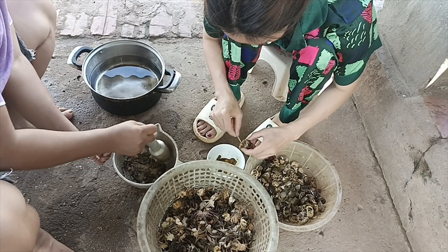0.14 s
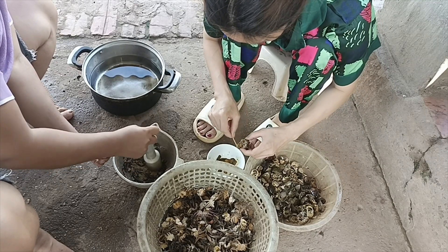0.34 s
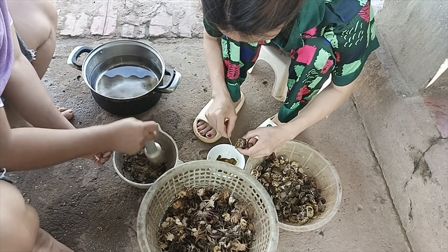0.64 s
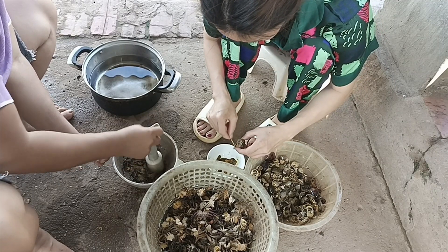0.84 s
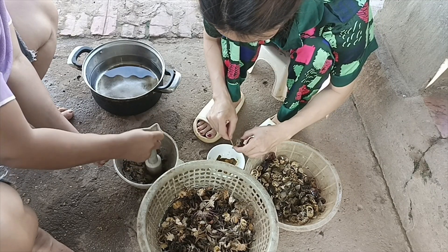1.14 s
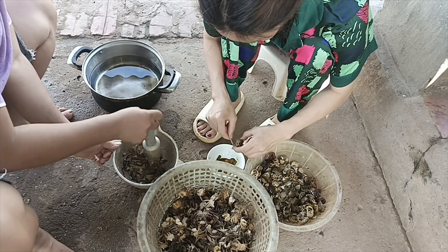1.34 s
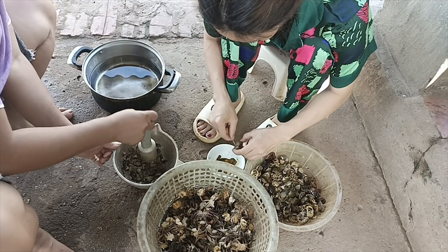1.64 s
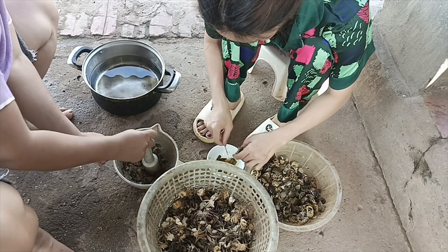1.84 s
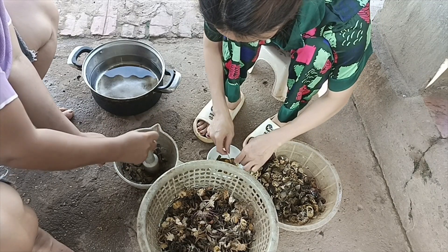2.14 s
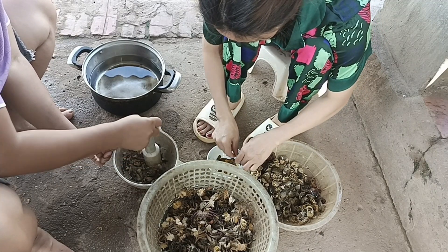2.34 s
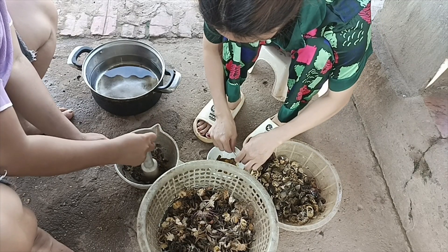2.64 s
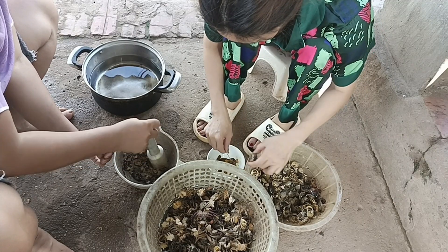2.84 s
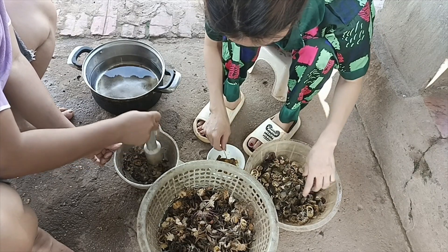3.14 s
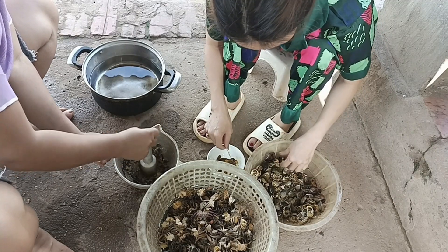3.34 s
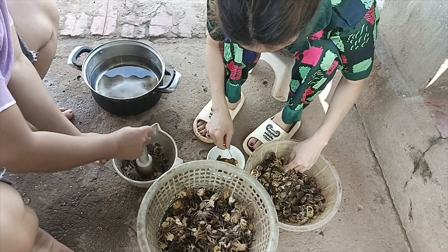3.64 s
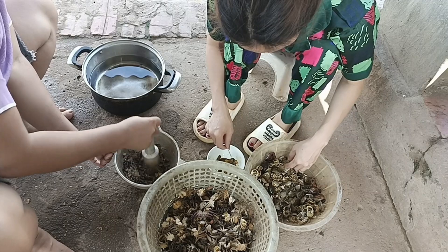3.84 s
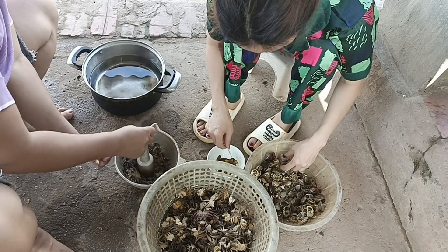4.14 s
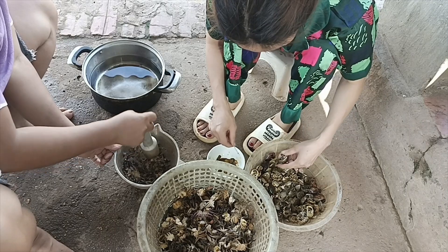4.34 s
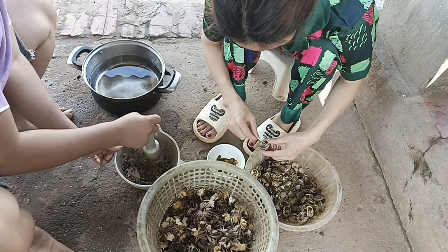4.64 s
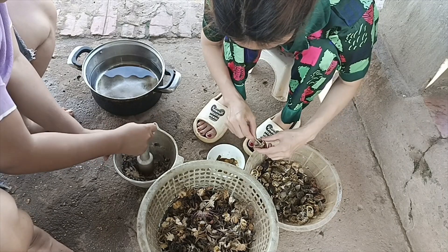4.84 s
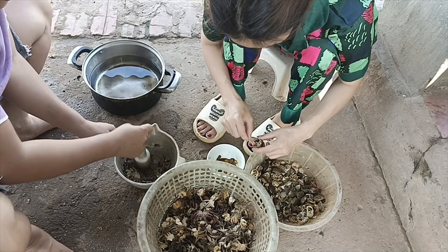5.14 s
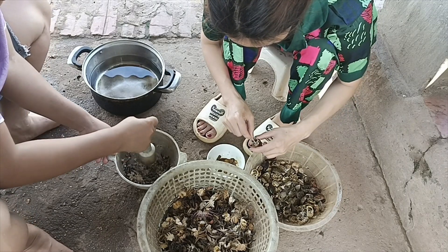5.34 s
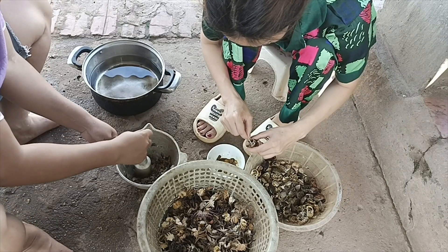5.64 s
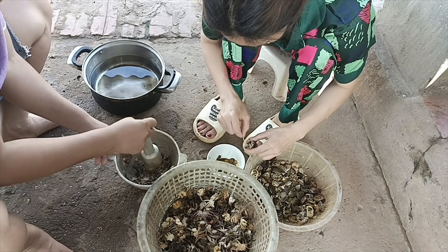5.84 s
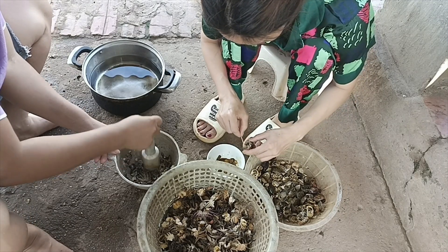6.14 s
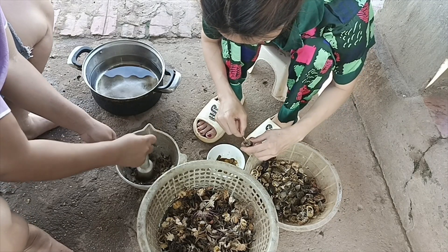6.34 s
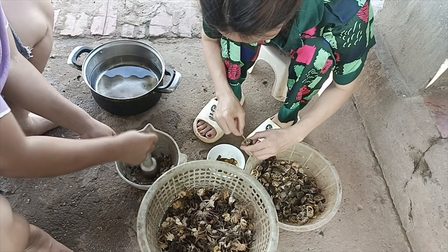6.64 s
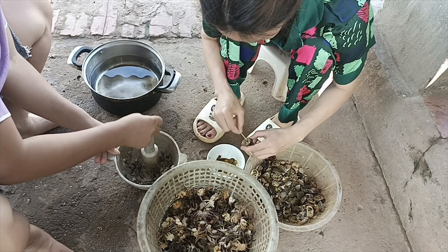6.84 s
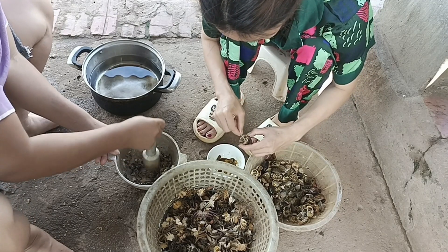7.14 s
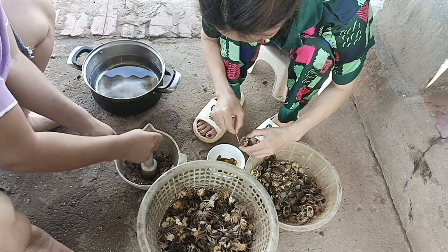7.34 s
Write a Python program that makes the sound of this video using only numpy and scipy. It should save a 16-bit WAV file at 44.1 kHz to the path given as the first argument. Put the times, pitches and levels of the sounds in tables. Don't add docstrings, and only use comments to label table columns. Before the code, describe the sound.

A pestle pounds shelled food in a small hollow bowl on concrete, about three crunchy knocks a second, with ringing rim clinks and rattling shells.

```python
import sys
import numpy as np
from scipy import signal
from scipy.fft import rfft, irfft, next_fast_len
from scipy.io import wavfile
from scipy.ndimage import uniform_filter1d

SR = 44100
rng = np.random.default_rng(int(sys.argv[2]) if len(sys.argv) > 2 else 0)


def wav_out(sig):
    wavfile.write(sys.argv[1], SR, np.round(np.clip(np.atleast_2d(sig).T, -1, 1) * 32767).astype(np.int16))


def decibels_to_gain(level_db):
    exponent = np.asarray(level_db, float) / 20
    return 10 ** exponent


N = 329868
LONG = int(0.6 * SR)
T = np.arange(LONG) / SR

# freq_hz, level_db per Hz
AIR = [(24, -52), (60, -10.5), (141, -9.5), (510, -23.5), (2090, -30.5), (6020, -50), (9240, -40),
       (16500, -62.5)]
# centre_hz, width_log_hz, boost_db
AIR_BANDS = [(725, 0.12, 11.5), (1280, 0.058, 13.5), (4250, 0.48, 5.5), (8350, .06, 7), (10400, 0.048, 12)]
AIR_FLUTTER_DB = (4.5, 3.5, 2, 5.5, 5.5)
# pitch_hz, level_db, t60_s
LEFT_OVER = [(701, -52, .5), (735, -60, .4), (1390, -37, .9), (2551, -40, .7), (3883, -65, .4),
             (3998, -65, .4)]

# start_s, crunch_db, t60_s, dullness_db per octave, snap_db
CRUSHES = [(0.096, -18, 0.43, 4, 6.5), (0.606, -22, 0.22, 0, 9.5), (0.982, -23, 0.31, 1, 15.5),
           (1.331, -22, 0.27, -1.5, 15), (1.702, -22, 0.32, 0, 14), (2.0511, -18.5, 0.32, 2, 9),
           (5.038, -26.5, 0.075, -5.5, 4.5), (5.4085, -11, 0.39, 4, 3.5), (6.226, -18.5, 0.41, 3.5, 11.5),
           (6.564, -20.5, 0.23, -2.5, 13.5), (6.8928, -24, 0.326, -0.5, 15.5), (7.216, -34.5, 0.48, -1, 18)]
# start_s, crunch_db, t60_s, dullness_db per octave, snap_db
SQUEEZES = [
    (2.4783, -19.5, 0.31, 4, 3.5),
    (2.8731, -21.5, 0.2, 2.5, 13),
    (3.2294, -21, 0.23, 2.5, 15.5),
    (3.5757, -20.5, 0.2, 1.5, 2),
    (3.9607, -21, 0.28, 0.5, 14),
    (4.3053, -17, 0.19, -2.5, -22),
    (4.7124, -21.5, 0.25, -3, 4.5),
    (4.7525, -30.5, 0.23, -1.5, 5),
    (5.0754, -25.5, 0.17, 0.5, -2.5),
    (5.856, -23, 0.23, 0, 13.5),
]
# freq_hz, level_db per Hz
CRUNCH = [(650, -42), (1300, -2), (4200, 3), (4750, -13), (6600, -11), (7950, -5), (9700, -13),
          (15300, -16)]

# start_s, peak_db, hollow_hz, clack_db re peak
BLOWS = [(0.095, -19, 679, 10), (0.114, -24, 680, -18), (0.131, -33, 758, 14.5), (0.982, -17, 846, -3.5),
         (1.334, -18.5, 739, -21), (1.702, -19, 585, 0), (2.051, -15.5, 689, 4), (2.48, -12, 703, 4),
         (2.507, -15, 800, 1.5), (2.548, -18, 739, -0.5), (2.874, -19, 804, -13.5), (3.586, -35, 750, -19),
         (3.964, -19.5, 730, -27), (4.278, -34, 710, -17), (4.316, -23.5, 717, -4.5),
         (4.359, -19, 727, -6.5), (4.371, -17, 692, -31), (4.712, -17, 815, -15), (4.742, -31, 670, 8),
         (5.037, -19, 690, -6.5), (5.081, -32, 718, -9), (5.408, -16, 682, 12.5), (5.539, -18.5, 718, -8),
         (5.564, -38.5, 702, 6), (5.858, -32, 763, -14), (6.564, -20, 813, 0.5), (6.893, -14.5, 758, -11.5)]
# start_s, peak_db, hollow_hz, porch_t60_s
ROCKS = [(0.141, -21.5, 723, 0.41), (0.608, -19, 756, 0.2), (0.69, -49.5, 700, 0.17),
         (0.724, -47, 719, 0.16), (0.743, -52, 785, 0.074), (1.707, -12, 837, 0.41),
         (2.521, -10.5, 742, 0.46), (2.893, -32, 734, 0.32), (3.232, -21.5, 721, 0.38),
         (3.296, -27, 755, 0.16), (3.66, -17, 697, 0.088), (3.675, -24.5, 737, 0.29),
         (3.786, -33, 714, 0.25), (3.797, -32.5, 750, 0.18), (3.878, -44, 681, 0.29),
         (3.892, -56, 720, 0.088), (4.036, -37, 745, 0.1), (4.059, -22, 725, 0.2),
         (4.186, -37.5, 665, 0.09), (4.199, -51.5, 698, 0.2), (4.261, -29, 640, 0.78),
         (4.386, -18, 716, 0.065), (4.427, -50, 720, 0.14), (4.831, -16, 719, 0.37),
         (4.873, -24, 724, 0.37), (4.915, -68, 770, 0.09), (5.171, -21.5, 681, 0.15),
         (5.2, -26.5, 710, 0.18), (5.433, -20, 717, 0.67)]
# pitch_ratio, level_db, t60_s
HOLLOW = [(0.622, -12.5, .03), (.76, -8, 0.027), (0.999, 3, 0.038), (1.02, -15.5, 0.11),
          (1.089, -2.5, 0.041), (1.241, -12.5, 0.033), (1.502, -24, 0.023)]
# pitch_hz, level_db, t60_s
CLACK = [(1370, -0.5, 0.011), (1653, -1.5, 0.013), (2000, -17, 0.018), (2570, -20, .01)]

# start_s, first_ring_db, first_ring_hz, second_ring_db, third_ring_db
RIMS = [
    (0.097, -33, 1396, -35, -32),
    (0.1114, -30.5, 1396, -33, -41.5),
    (2.48, -27, 1390, -15.5, -39.5),
    (4.716, -51, 1384, -48, -49.5),
    (5.034, -47.5, 1410, -52.5, -64),
    (5.406, -32.5, 1425, -35, -27.5),
]
RIM_ASIDE = [
    (1.2, 0.1, .55),
    (1.2, 0.1, .55),
    (.6, -.05, .7),
    (.4, .2, .3),
    (.4, 0, 0),
    (.8, 1.1, .6),
]
UPPER_HZ = (2546, 3885)
# t60_s, gate_close_s at -30 dB, twin_db
RINGS = [
    (.58, 0.42, -11.5),
    (.55, 0.36, -16),
    (0.4, 0.33, -14),
]
TWINS = (1.2, 1.012, 1.028)
# pitch_hz, level_db re first ring, t60_s
RIM_HIGH = [(1744, -7.5, 0.17), (4350, -27, 0.15), (5550, -23, 0.16), (6500, -25, 0.13), (7800, -28, 0.28),
            (8840, -28, 0.15), (10200, -33, .12)]
# start_s, level_db, pitch_hz, t60_s
WOKEN = [(0.098, -19.5, 2502, 0.18), (0.098, -25.5, 2550, 0.23), (0.096, -26, 3995, .22),
         (0.096, -38.5, 3100, 0.12), (0.113, -30.5, 2590, .3), (2.48, -33.5, 3996, 0.39),
         (2.48, -38, 2680, .4), (2.48, -40.5, 2433, .3), (5.407, -41, 2732, .4), (5.407, -41, 2400, 0.28),
         (5.6, -49.5, 683, .35)]

# start_s, level_db, centre_hz, spread_0_to_1, t60_s
CHATTER = [(0.098, -26, 2210, 0.26, 0.22), (0.112, -34.5, 3884, 0.03, 0.35), (2.481, -30, 2923, 0.19, 0.36),
           (2.482, -39, 3170, 0.23, 0.21), (2.49, -55, 5470, 0, 0.2), (4.75, -47, 5250, 0.04, 0.26),
           (5.408, -38, 2884, 0.28, 0.31), (5.41, -49, 4470, 0.2, 0.19), (5.41, -52.5, 5550, 0, .3),
           (6.228, -30.5, 2600, 0.06, 0.51), (6.895, -44, 4900, 0.17, 0.33), (6.23, -30, 1620, 0.1, 0.64),
           (0.1, -36, 1700, 0.05, 0.34), (2.053, -42, 3500, 0.22, 0.27), (6.897, -32.5, 785.5, 0.3, 0.19),
           (7.22, -42, 2560, 0.04, 0.22), (7.225, -33.5, 962, 0, 0.97), (1.71, -35.5, 949, 0.2, 0.49),
           (1.71, -49, 3300, 0.5, 0.19), (6.3, -46.5, 4800, 0.004, 0.39), (6.24, -52.5, 7300, 0.06, 0.46),
           (3.6, -47, 2700, 0.2, 0.1)]
# start_s, peak_db, pitch_hz, t60_s
PUNCHES = [(0.101, -22, 1340, 0.0039), (0.1147, -15.5, 1210, 0.0062), (0.9815, -10.5, 919, 0.02),
           (1.7016, -9.5, 468, 0.015), (1.7038, -9, 1136, 0.011), (1.7056, -22.5, 980, 0.0073),
           (2.052, -14, 1020, 0.01), (2.480, -8.5, 1605, 0.013), (2.5235, -12, 865, 0.018),
           (5.404, -27, 1570, 0.019), (6.2273, -6, 1625, 0.013), (6.8935, -7.5, 757, 0.019),
           (7.2164, -6.5, 1204, 0.0096), (7.2178, -7, 837, 0.011)]

# start_s, level_db
RAPS = [
    (0.11, -43.5),
    (2.51, -34),
    (4.36, -39.5),
    (4.832, -41.5),
    (5.415, -39),
    (5.688, -70),
    (6.245, -36),
    (7.282, -35.5),
]
# pitch_hz, level_db, t60_s
RAP = [(224, -1.7, 0.0095), (246, -2.5, 0.041), (340, -0.1, 0.096)]
# start_s, level_db, packed_food_db re slab, porch_t60_s
THUDS = [(0.602, -44.5, 10.5, 0.28), (0.72, -53, -1.5, 0.31), (0.979, -32.5, -1.5, 0.3),
         (1.15, -51.5, -11, 0.19), (1.332, -26.5, -7, 0.32), (1.41, -41.5, -10, 0.19),
         (1.699, -30, -2.5, 0.61), (2.05, -29.5, 3, 0.53), (2.87, -40, -9, 0.35), (3.229, -34.5, -13, 0.29),
         (3.968, -50, 0, 0.44), (5.856, -47, -17.5, 0.35), (6.565, -31.5, -13.5, 0.2),
         (6.629, -41, -29, 0.2), (6.889, -29.5, -6, 0.46), (7.214, -38, 4, 0.62)]
# pitch_hz, level_db, t60_s
SLAB = [(86, 6.5, 0.032), (140, -7, 0.0083), (195.4, 4, 0.071), (243, -2, 0.073)]
# pitch_hz, level_db, t60_s
PACKED = [(314, 0.5, 0.012), (355, 7, 0.019), (430, 0, 0.054), (485, -6.5, 0.031), (980, 3, 0.013),
          (1200, -6.5, 0.049)]

# start_s, level_db, pitch_hz, t60_s
BITS = [(1.102, -49.5, 4030, 0.36), (1.118, -53, 3095, 0.17), (1.149, -45, 342, 0.28),
        (1.155, -56.5, 877, 0.46), (1.218, -58.5, 2370, 0.34), (1.275, -47.5, 358, 0.33),
        (1.34, -47, 4450, 0.34), (1.342, -36, 3490, 0.22), (2.301, -59, 2145, 0.16),
        (3.47, -56.5, 1426, 0.22), (3.469, -56, 2150, 0.14), (3.471, -54, 3910, 0.084),
        (3.661, -64.5, 3860, 0.4), (4.056, -50, 1240, 0.36), (6.12, -63, 682, 0.14),
        (1.185, -66, 2700, 0.19), (6.48, -64.5, 3730, 0.24), (7.102, -59.5, 4230, 0.078)]
# start_s, level_db, t60_s
PESTLE = [
    (1.708, -49, 1),
    (2.055, -47.5, 0.98),
    (6.894, -55, 0.57),
]

# start_s, level_db, swell_s, t60_s
RUSTLES = [
    (3.059, -45.5, 0.013, 0.068),
    (3.08, -38.5, .01, 0.035),
    (3.101, -43, 0.014, 0.12),
    (3.194, -62, 0.0047, 0.027),
    (3.469, -64.5, .01, 0.24),
]
# freq_hz, level_db per Hz
RUSTLE = [(880, -78), (1500, -30.5), (3220, 0.5), (4460, -6.5), (5120, -19.5), (8240, -22), (9280, -30),
          (16000, -26.5)]
# start_s, level_db, swell_s, t60_s
TICKS = [
    (6.163, -68, .003, 0.0293),
    (2.3, -62, .003, 0.038),
    (5.5, -68, .003, 0.038),
    (5.394, -71, .003, 0.015),
]
# freq_hz, level_db per Hz
TICK = [(2500, -40.5), (4200, -6), (5600, -11.5), (6800, 1), (8600, -32), (12000, -24)]

# start_s, peak_db, hollow_hz
SLAMS = [
    (6.228, -11, 778),
    (7.2175, -13.5, 742),
]
# pitch_hz, level_db, t60_s
STONE = [(480, -18.5, 0.0039), (1006, 2, 0.0083), (1269, -5, 0.011), (1400, 1, 0.019),
         (2150, -13.5, 0.0068), (2500, -15, 0.048)]

# freq_hz, left_minus_right_db
LEFT_MINUS_RIGHT = [(345, -2), (1550, 0.5), (5000, -3), (7000, -6), (7950, -12.5), (10200, 11), (13800, 10),
                    (15500, -2)]
# freq_hz, lead_rad
LEFT_LEADS = [(0, 0), (690, -.36), (1720, -1.3), (2580, -2.05), (4000, -3.9), (5500, -4.1), (7150, -4.8),
              (9300, -4.6), (13400, -9.4), (16400, -17)]

GATE_RATIO, SLAM_GATE_RATIO = 0.43, 0.26
BLOW_WET_DB, ROCK_WET_DB, WET_DB_PER_DB = -2, -4, -0.56
BLOW_PORCH_S, PORCH_S_PER_DB = 0.18, 0.06
RIM_FLUTTER_DB = 3


def fall(t60, t=T):
    return np.exp(-np.log(1000) * t / np.maximum(t60, 0.003))


def swell(rise_s, t=T):
    return 1 - np.exp(-t / rise_s)


def shut(after, t=T):
    return 1 / (1 + (t / after) ** 6)


def flutter(db, rate, size=LONG):
    hold = int(SR / rate)
    steps = rng.standard_normal(size // hold + 1).repeat(hold)
    return decibels_to_gain(db * uniform_filter1d(steps, hold)[:size])


def colour(x, points):
    size = next_fast_len(x.shape[-1])
    hz, db = np.transpose(points)
    shape = np.interp(np.log(np.fft.rfftfreq(size, 1 / SR) + 1), np.log(hz), db)
    return irfft(rfft(x, size) * decibels_to_gain(shape), size)[..., :x.shape[-1]]


def unit(x):
    return x / np.sqrt(np.mean(x ** 2))


def ring(modes, spread_db=2.5, size=LONG):
    hz, db, t60 = np.transpose(modes)[:, :, None]
    chance = rng.standard_normal((2, len(modes), 1))
    t = T[:size]
    level = decibels_to_gain(db + spread_db * chance[0])
    sign = np.where(spread_db * chance[1] < 0, -1, 1)
    return np.sum(level * sign * np.sin(2 * np.pi * hz * t) * fall(t60, t), axis=0)


def crackle(points, dull_db, size=LONG):
    bursts = np.minimum(rng.exponential(size=size // 24 + 1), 3).repeat(24)[:size]
    grains = rng.standard_normal(size) * decibels_to_gain(2.5 * bursts)
    hz = np.arange(1000, 17000, 220)
    uneven = 4 * rng.standard_normal(len(hz)) - dull_db * np.log2(hz / 4000)
    return unit(colour(colour(grains, points), np.transpose([hz, uneven])))


def porch():
    echoes = rng.standard_normal((3, 2 * LONG)) * decibels_to_gain([[0], [-5], [-5]])
    dull = colour(echoes, [(2500, -3.5), (6000, -29.0)])
    return np.array([dull, echoes - dull])


def add(bus, s, dry, wet_db, t60, gate_ratio=GATE_RATIO, build_s=0.0026, aside=0.057, creep=0):
    rows, echoes = bus
    t = T[:int(2 * gate_ratio * t60 * SR)]
    start = rng.integers(LONG)
    dull, bright = echoes[:, :, start:start + len(t)]
    build = 1 - np.exp(-(t / build_s) ** 2)
    tail = dull * fall(t60, t) + bright * fall(0.71 * t60, t)
    tail = tail * build * shut(gate_ratio * t60, t) * decibels_to_gain(wet_db - 28.0)
    out = signal.fftconvolve(tail, dry[None], axes=1)[:, :LONG]
    out[:2, :len(dry)] += np.outer([1, aside], dry)
    out[1, :len(dry)] += creep
    i = int(s * SR)
    rows[:, i:i + out.shape[1]] += out


def air():
    noise = rng.standard_normal((3, N))
    both = colour(noise[0], [(300, -4.5), (3000, -10.5)])
    apart = colour(noise[1:], [(100, -13.5), (1500, 4.5)])
    grid = np.geomspace(300, 16000, 200)
    boost = sum(db * np.exp(-(np.log(grid / hz) / width) ** 2) for hz, width, db in AIR_BANDS)
    floor = colour(colour(both + apart, AIR), np.transpose([grid, boost]))
    floor = unit(floor) * decibels_to_gain(-72)
    below = [0]
    for hz in (500, 2000, 5500, 9000):
        below.append(colour(floor, [(hz, 0), (1.15 * hz, -40)]))
    below.append(floor)
    bands = zip(below, below[1:], AIR_FLUTTER_DB)
    return sum((top - bottom) * flutter(db, 35, size=N) for bottom, top, db in bands)


def left_over(bus):
    add(bus, 0, ring(LEFT_OVER, 0) * shut(0.078), -26, 0.2, aside=0.067)


def food(bus):
    handfuls = [(0.0069, *row) for row in CRUSHES] + [(0.02, *row) for row in SQUEEZES]  # lead, s
    soft = signal.butter(2, 6000, fs=SR, output="sos")
    for lead, s, db, t60, dull_db, snap_db in handfuls:
        t = T[:int((lead + t60) * SR)]
        after = np.maximum(t - lead, 0)
        squeeze = np.minimum(t / lead, 1) ** 2
        grind = fall(t60, after) * shut(0.6 * t60, after) * flutter(1.5, 150, size=len(t))
        snap = decibels_to_gain(snap_db + 3.5) * fall(0.008, after) * (t > lead)
        grains = crackle(CRUNCH, dull_db, size=len(t))
        dull = signal.sosfilt(soft, grains)
        grains = dull + (grains - dull) * fall(t60 / 0.9 * 2, after)
        add(bus, s - lead, decibels_to_gain(db - 14.0) * grains * squeeze * (grind + snap), -7, 0.13, aside=0.097)


def bowl(bus):
    size = LONG // 5
    push = swell(0.0009, T[:size])
    lean = signal.butter(2, 330, "high", fs=SR, output="sos")
    knocks = [(*row, BLOW_WET_DB, BLOW_PORCH_S + PORCH_S_PER_DB * (row[1] + 20)) for row in BLOWS]
    knocks += [(s, db, hz, -40.5, ROCK_WET_DB, t60) for s, db, hz, t60 in ROCKS]
    for s, db, hz, clack_db, wet_db, t60 in knocks:
        wet_db = wet_db + WET_DB_PER_DB * (db + 20)
        body = ring([(hz * ratio, d, t) for ratio, d, t in HOLLOW], size=size)
        stony = [(f * (1 + 0.063 * rng.standard_normal()), d, t) for f, d, t in CLACK]
        clack = ring(stony, 3, size=size)
        knock = decibels_to_gain(db - 2.5) * (body + decibels_to_gain(clack_db) * clack) * push
        add(bus, s, signal.sosfilt(lean, knock), wet_db, max(t60, 0.1))


def ring_gate(after, db):
    return shut(max(after + 0.018 * (db + 30), 0.08))


def rim(bus):
    push = swell(0.0008)
    for s, db, hz, second_db, third_db, *shares in np.hstack([RIMS, RIM_ASIDE]):
        wall = []
        for f, d, (t60, after, twin_db), twin in zip((hz, *UPPER_HZ), (db, second_db, third_db), RINGS, TWINS):
            pair = ring([(f, d, t60), (f * twin, d + twin_db, 0.42 * t60)], 0)
            wall.append(pair * ring_gate(after, d) * flutter(RIM_FLUTTER_DB, 90))
        wall = np.array(wall)
        high = ring([(f, db + d, t) for f, d, t in RIM_HIGH]) * flutter(5.5, 150)
        hum = ring([(718, db - 5, 0.53)], 0)
        high += hum * flutter(RIM_FLUTTER_DB, 49) * ring_gate(0.37, db)
        add(bus, s, (wall.sum(axis=0) + high) * push, -17, 0.3, creep=shares @ wall * push)
    for s, db, hz, t60 in WOKEN:
        woken = ring([(hz, db, t60)], 0) * flutter(RIM_FLUTTER_DB, 66) * push
        add(bus, s, woken[:int(t60 * SR)], -17, 0.2)


def chatter(bus):
    for s, db, hz, spread, t60 in CHATTER:
        t = T[:int(0.8 * t60 * SR)]
        places = np.linspace(-1.6, 1.6, 12) + 0.1 * rng.standard_normal(12)
        cluster = [(hz * np.exp(spread * k), db - 10, t60) for k in places]
        chat = ring(cluster, 2, size=len(t)) * shut(0.55 * t60, t)
        chat = chat * flutter(5, 200, size=len(t)) * swell(0.004, t)
        add(bus, s, chat, -11, 0.14, aside=0.08)


def punches(bus):
    t = T[:LONG // 20]
    for s, db, hz, t60 in PUNCHES:
        punch = ring([(hz, db + 4.5, t60)], 0, size=len(t)) * swell(0.00089, t)
        add(bus, s, punch, -12.5, 0.41)


def slab(bus):
    size = LONG // 4
    push = swell(0.004, T[:size])
    for s, db in RAPS:
        add(bus, s, decibels_to_gain(db) * ring(RAP, 2.0, size=size) * push, 4.0, 0.37, 0.4, 0.015)
    for s, db, packed_db, t60 in THUDS:
        thud = ring(SLAB, 2.0, size=size) * push
        packed = decibels_to_gain(packed_db) * ring(PACKED, size=size)
        add(bus, s, decibels_to_gain(db - 4.0) * (thud + packed), 4.0, t60, 0.3, 0.015)


def shell_bits(bus):
    for s, db, hz, t60 in BITS:
        cluster = [(hz * (1 + 0.02 * k), db - 12, t60) for k in rng.standard_normal(6)]
        t = T[:int(t60 * SR)]
        ting = ring(cluster, 2.1, size=len(t)) * shut(1.2 * t60, t) * flutter(5, 130, size=len(t))
        add(bus, s, ting * swell(0.047 * t60, t), -24, 0.25, aside=0.4)


def pestle(bus):
    for s, db, t60 in PESTLE:
        ting = ring([(1526, db + 2, t60)], 0) * shut(0.84 * t60) * flutter(1.2, 43)
        add(bus, s, ting * swell(0.012), -30, 0.25, aside=0.91)


def rustles_and_ticks(bus):
    touches = [(RUSTLE, *row) for row in RUSTLES] + [(TICK, *row) for row in TICKS]
    for points, s, db, swell_s, t60 in touches:
        t = T[:int((swell_s + t60) * SR)]
        shape = np.minimum(t / swell_s, 1) * fall(t60, np.maximum(t - swell_s, 0))
        grains = crackle(points, 0, size=len(t))
        add(bus, s - swell_s, decibels_to_gain(db) * grains * shape, -3, 0.08, aside=0.21)


def slams(bus):
    blunt = signal.butter(14, 2850, fs=SR, output="sos")
    thin = signal.butter(3, 570, "high", fs=SR, output="sos")
    for s, db, hz in SLAMS:
        stone = [(f, d - 4, t) for f, d, t in STONE]
        blow = decibels_to_gain(db) * ring([(hz, 0, 0.024)] + stone, 0, size=LONG // 6)
        blow = signal.sosfilt(np.vstack([thin, blunt]), blow)
        add(bus, s, blow, -2.5, 0.78, SLAM_GATE_RATIO, 0.02)
        hum = ring([(742, db - 15.5, 0.57)], 0) * flutter(5.37, 64)
        add(bus, s, hum * swell(0.0073), -15, 0.3)


def scene():
    rows = np.zeros((3, next_fast_len(N + LONG)))
    bus = rows, porch()
    hiss = air()
    for source in (left_over, food, bowl, rim, chatter, punches, slab, shell_bits, pestle,
                   rustles_and_ticks, slams):
        source(bus)
    hz = np.fft.rfftfreq(rows.shape[1], 1 / SR)
    turn = -np.interp(hz, *np.transpose(LEFT_LEADS))
    late = irfft(rfft(rows[0]) * np.exp(-1j * turn), rows.shape[1])[:N]
    apart = colour(rows[1:, :N], [(150, -9.0), (600, 3.5), (1500, 7.0), (8000, 17)]) + hiss
    left = colour(late + apart[0], [(f, d / 2) for f, d in LEFT_MINUS_RIGHT])
    right = colour(rows[0, :N] + apart[1], [(f, -d / 2) for f, d in LEFT_MINUS_RIGHT])
    return np.array([left, right])


def low_pass(x):
    return signal.sosfilt(signal.butter(12, 16810, fs=SR, output="sos"), x)


def record(dry):
    bass_cut = signal.butter(3, 66, "high", fs=SR, output="sos")
    top_cut = signal.butter(12, 15700, fs=SR, output="sos")
    mix = signal.sosfilt(np.vstack([bass_cut, top_cut]), dry)
    return low_pass(mix)


dry = scene()
out = record(dry)
wav_out(out)
```